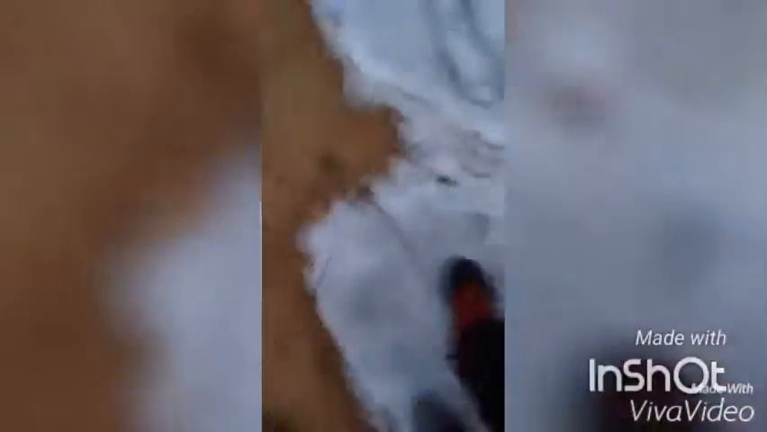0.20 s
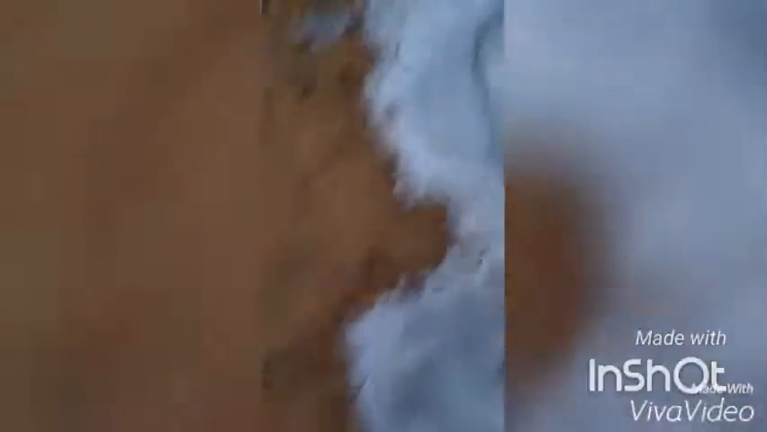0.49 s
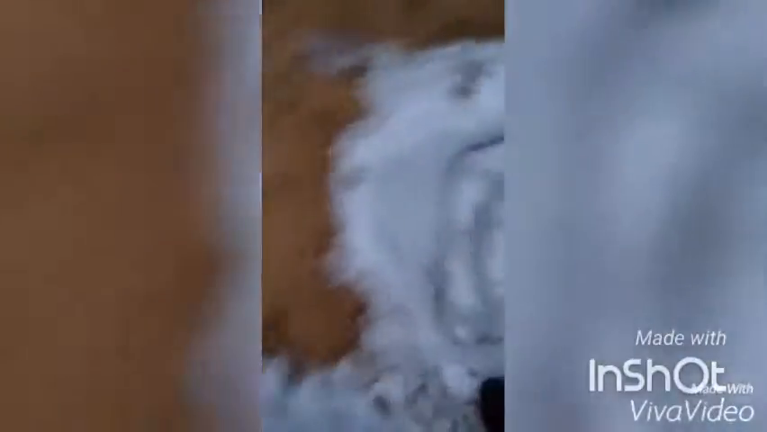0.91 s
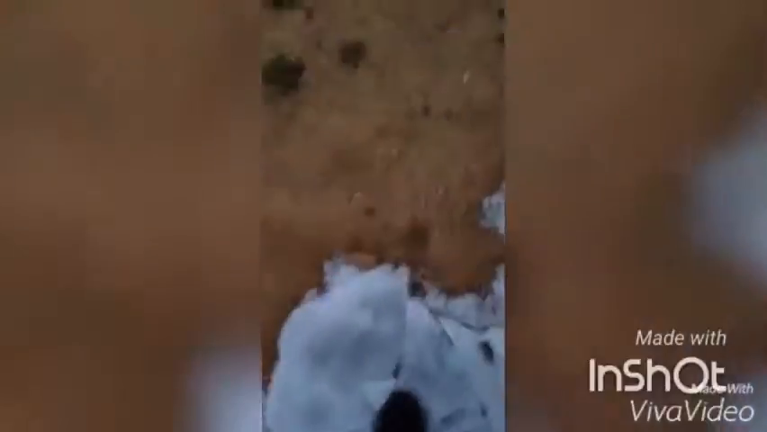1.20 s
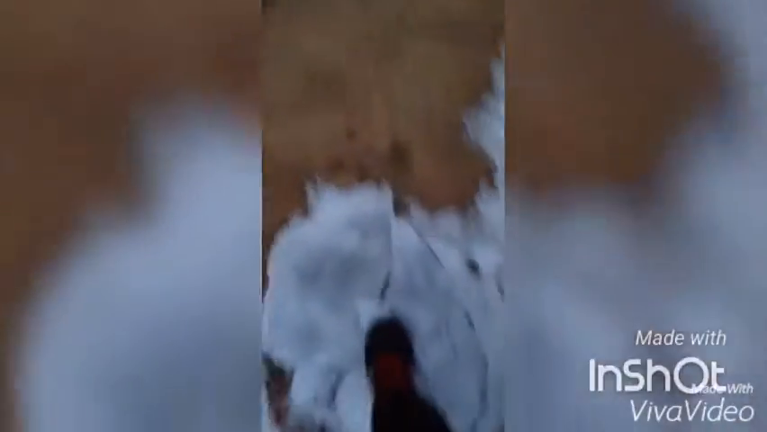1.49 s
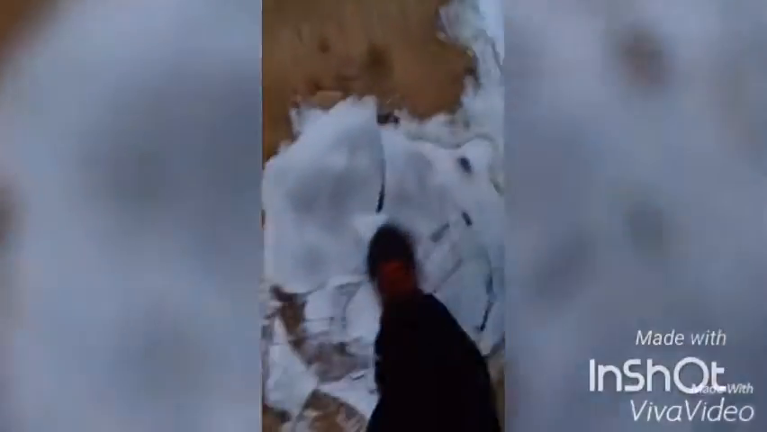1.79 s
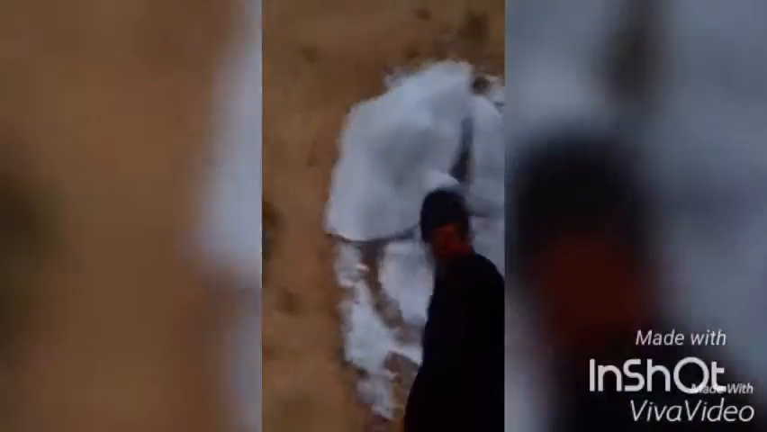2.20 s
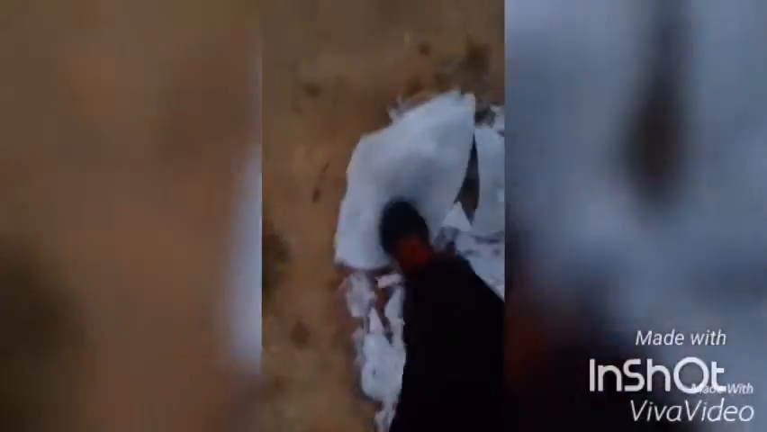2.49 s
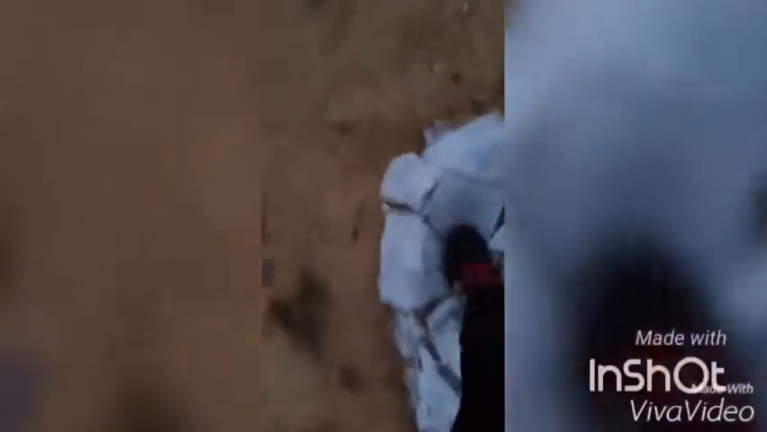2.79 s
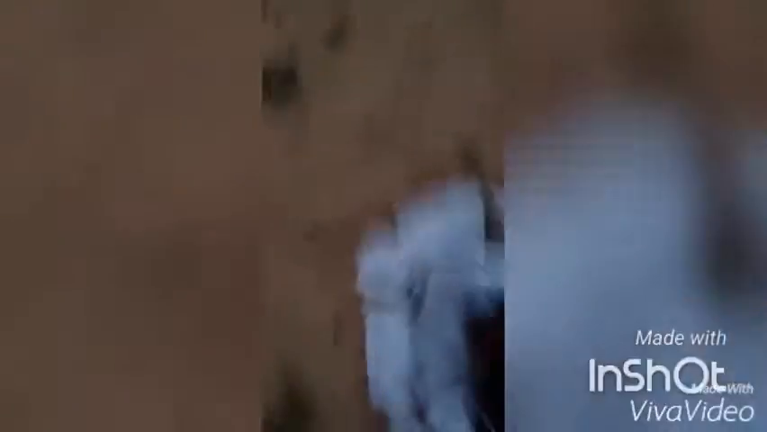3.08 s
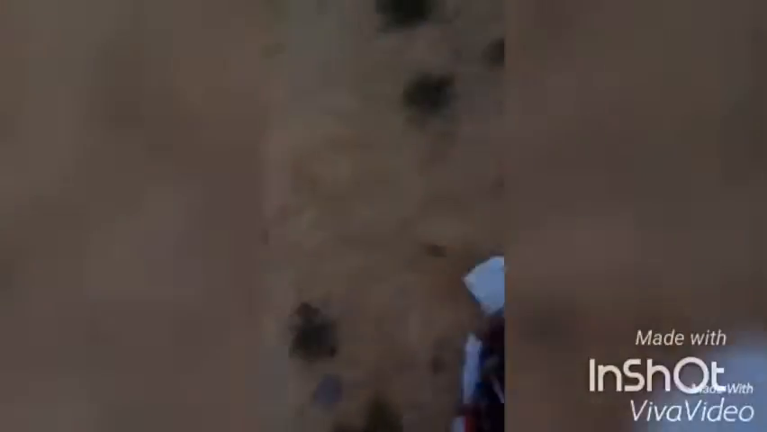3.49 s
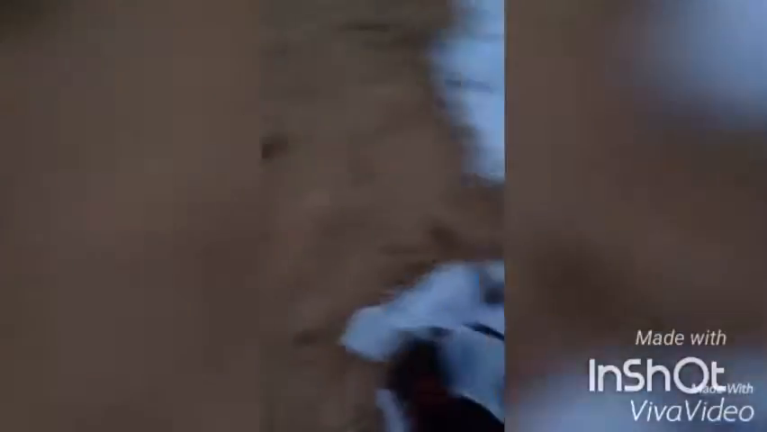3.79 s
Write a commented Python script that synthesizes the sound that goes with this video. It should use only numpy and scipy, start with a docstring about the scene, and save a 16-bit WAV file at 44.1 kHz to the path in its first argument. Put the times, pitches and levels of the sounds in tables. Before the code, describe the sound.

Shoes tread on brittle icy snow over bare ground outdoors, close to the microphone: a sudden heavy crunch, scattered snaps and softer crumbling with low thuds, then sharp cracks near the end and a quick fade.

```python
"""Outdoors on bare ground, close to the microphone: shoes tread through a brittle crust of ice and snow.
Plates snap as dying volleys of clicks with a short knock; the crust crumbles into many tiny fractures,
each ticking and knocking one of thirty fragments. Flakes chip off, loose slabs grind or ring from a short
knock, and the walker's weight makes the sheet thud and rumble. Noise gives the hiss of packing snow and
the quiet air behind."""
import sys
import numpy as np
from scipy import signal
from scipy.io import wavfile

SR = 44100
rng = np.random.default_rng(int(sys.argv[2]) if len(sys.argv) > 2 else 0)


def dump(signal):
    """Clip the signal to [-1, 1] and save it as 16-bit WAV at the path in sys.argv[1]."""
    limited = np.clip(np.atleast_2d(signal).T, -1, 1)
    pcm = np.round(limited * 32767).astype(np.int16)
    wavfile.write(sys.argv[1], SR, pcm)


N = 174195
T = np.arange(N) / SR

# Crumbling under the sole. Each row: time in seconds, level of the fine grains in dB,
# level of the coarse chunks in dB.
CRUSH = [(0.1,-69,-66.5),(0.226,-50.5,-42.5),(0.236,-20,-26),(0.33,-19,-22.5),(0.485,-23,-20.5),(0.51,-29.5,-33),(0.595,-20.5,-29.5),(0.635,-34.5,-34),(0.72,-46,-53.5),(0.865,-38.5,-45.5),(0.89,-25,-39.5),(0.95,-29,-34.5),(1.135,-25,-31.5),(1.18,-33,-41.5),(1.37,-61,-61),(1.55,-32,-38),(1.68,-53.5,-61),(1.74,-46.5,-36.5),(1.83,-51.5,-56),(1.925,-42,-34.5),(1.98,-24,-21.5),(2.085,-38,-33),(2.12,-65,-59),(2.2,-48,-41),(2.245,-58.5,-44),(2.275,-37,-29.5),(2.38,-27.5,-25),(2.48,-29.5,-29),(2.58,-37,-35),(2.675,-46,-62),(2.8,-28,-29),(2.87,-34,-33.5),(2.96,-32.5,-28.5),(3.025,-37.5,-41.5),(3.15,-45.5,-60),(3.175,-29,-32.5),(3.31,-41,-38),(3.44,-43,-40.5),(3.495,-29.5,-36),(3.603,-38,-33),(3.624,-16,-23.5),(3.68,-41.5,-44.5),(3.74,-35.5,-51.5),(3.93,-52,-58.5)]
# Spectrum of coarse, chunky ice. Each row: frequency in Hz, density in dB per Hz.
COARSE = [(50,-59.5),(190,-10),(420,-2.5),(650,-3.5),(1200,-4),(4000,-18.5)]
SNAP_SPAN_S = 0.011  # cracks and chips have their levels counted over this span


def amp(db):
    """Decibels to gain."""
    return 10 ** (np.asarray(db) / 20)


def unit(x, seconds=None):
    """Scales to rms 1, counting all energy as lying within the given span."""
    span = seconds * SR if seconds else len(x)
    return x / np.sqrt(np.sum(x ** 2) / span + 1e-20)


def add(mix, s, sound):
    """Mixes a sound in at time s, in place."""
    part = mix[max(round(s * SR), 0):][:len(sound)]
    part += sound[:len(part)]


def colour(x, points, size=4096):
    """Causal minimum-phase filter with the given spectrum in Hz and dB."""
    hz, db = np.transpose(points)
    f = abs(np.fft.fftfreq(size, 1 / SR))
    log_gain = np.log(amp(np.interp(np.log(f + 1), np.log(hz), db)))
    spectrum = np.exp(np.conj(signal.hilbert(log_gain)))
    taps = np.fft.ifft(spectrum).real[:size // 2]
    return signal.fftconvolve(x, taps)[:len(x)]


def resonance(x, hz, q):
    """A single resonance set ringing by x."""
    return signal.lfilter(*signal.iirpeak(hz, q, fs=SR), x)


def level(table, axis):
    """Gain curve over the whole scene from one dB column of a table."""
    rows = np.array(table)
    return amp(np.interp(T, rows[:, 0], rows[:, axis]))


def tread_effort():
    """How hard the sole crushes the crust: the fine-grain level relative to -30 dB."""
    return level(CRUSH, axis=1) / amp(-30)


def fractures(n, per_s, spread_db, cap):
    """Random clicks of either sign; their dB sizes are exponentially spread up to a cap."""
    sizes = amp(spread_db * np.minimum(rng.exponential(1, n), cap))
    signs = rng.choice([-1, 1], n)
    return sizes * signs * (rng.random(n) < per_s / SR)


def steadied(x, seconds):
    """Evens out the slow level and keeps the grain."""
    power = signal.fftconvolve(x ** 2, np.hanning(int(seconds * SR)), "same")
    return unit(x / np.sqrt(abs(power) + 1e-9))


def crack(db, body_db, treble_db, hz, size=3000):
    """A fracture runs through a plate as a quick dying volley of clicks, and the plate knocks."""
    # Spectra of the snap and of its treble splinters. Each row: frequency in Hz, density in dB per Hz.
    snap_spectrum = [(100,-52.5),(900,-3),(1600,-3),(2600,-2.5),(3400,0),(4700,-3),(6500,-8),(10000,-31.5)]
    splinter_spectrum = [(4000, -21.5), (5500, 12.5), (8000, 6), (10000, -4.5)]
    plate_fade_s, plate_share = 0.0028, 0.75  # share of the body's power from the plate's knock
    t = np.arange(size) / SR

    fade_s = 0.0028 * 2 ** ((db + 46.5) / 31)  # louder cracks run longer, doubling every 31 dB
    run = fractures(size, per_s=7000, spread_db=3.0, cap=1.9)
    debris = 0.017 * np.sqrt(amp(db + 13.0)) * np.exp(-t / 0.05)  # big cracks shed more crumbs
    volley = run * (np.exp(-t / fade_s) + debris)
    volley = volley + resonance(volley, rng.uniform(2800, 7670), 12)  # a splinter rings

    plate = np.cos(2 * np.pi * hz * t) * np.minimum(t * hz, 1) * np.exp(-t / plate_fade_s)
    rubble = unit(colour(volley, COARSE))
    body = np.sqrt(plate_share) * unit(plate) + np.sqrt(1 - plate_share) * rubble

    snap = unit(colour(volley, snap_spectrum), SNAP_SPAN_S)
    splinters = unit(colour(volley, splinter_spectrum), SNAP_SPAN_S)
    return amp(db) * (snap + amp(body_db) * unit(body, SNAP_SPAN_S) + amp(treble_db) * splinters)


def crumbling(count=30, size=1024):
    """Each tiny fracture ticks and knocks one of many fragments; light treading leaves them sparse."""
    # Spectrum of the fine grains. Each row: frequency in Hz, density in dB per Hz.
    fine_spectrum = [(80,-67),(300,-27),(900,-1),(1600,3),(2700,-9),(3300,1.5),(7000,-2),(9800,-7.5)]
    fractures_per_s, crowding = 1300, 0.4  # rate at effort 1; exponent by which it follows effort
    shard_pitch_ratio = 2.43  # small shards knock this much higher than slabs

    rate = fractures_per_s * tread_effort() ** crowding
    clicks = fractures(N, per_s=rate, spread_db=5.0, cap=3.56)
    fragment = rng.integers(0, count, N)
    t = np.arange(size) / SR
    fine, coarse = np.zeros((2, N))
    tick_hz = rng.permutation(np.geomspace(1700, 9500, count))
    for k, knock_hz in enumerate(np.geomspace(380, 1600, count)):
        tick_noise, knock_noise = rng.standard_normal((2, size))
        ring = resonance(tick_noise * np.exp(-t / 0.0029), tick_hz[k], 7)
        snap = tick_noise * np.exp(-t / 0.00065)
        tick = unit(ring) + 0.64 * unit(snap)
        tone = np.sin(2 * np.pi * knock_hz * t) * np.exp(-t * knock_hz / 2.8)
        thump = knock_noise * np.exp(-t / 0.0013)
        knock = unit(tone) + 1.4 * unit(thump)
        # A fragment with a higher tick ticks louder and knocks softer.
        tilt = np.sqrt(tick_hz[k])
        own = clicks * (fragment == k)
        fine += signal.oaconvolve(own, tick * tilt)[:N]
        coarse += signal.oaconvolve(own, knock / tilt)[:N]

    # The pieces get smaller and knock higher as the sheet is trampled.
    broken = (T / T[-1]) ** 2
    slabs = unit(colour(coarse, COARSE))
    shards = unit(colour(coarse, np.array(COARSE) * [shard_pitch_ratio, 1]))
    chunks = (1 - broken) * slabs + broken * shards
    grains = steadied(colour(fine, fine_spectrum), 0.073)
    return grains * level(CRUSH, axis=1) + steadied(chunks, 0.6) * level(CRUSH, axis=2)


def chip(db, size=1024):
    """A small flake breaks off in one sharp tick and rings briefly at its own pitch."""
    fade_s = 0.0013
    tick = rng.standard_normal(size) * np.exp(-np.arange(size) / SR / fade_s)
    ring = resonance(tick, rng.uniform(1270, 7660), 10)
    snap = colour(tick, [(200, -12.5), (700, 0.5), (9000, -6)])
    return amp(db) * unit(snap + 2 * ring, SNAP_SPAN_S)


def loose_slab(length, db, hz):
    """A loose slab grinds, or rings from a short knock: quick uneven jolts excite its resonance."""
    width_hz = 71
    n = int(length * SR)
    jolts = fractures(n, per_s=1100, spread_db=5.5, cap=3.5)
    ring = resonance(jolts, hz, hz / width_hz)
    return amp(db) * unit(ring * signal.windows.tukey(n))


def thud(db, size=6000):
    """The sheet flexes against the ground: a few damped, uneven cycles."""
    centre_hz, rise_s, fade_cycles, span_s = 166, 0.0033, 1.8, 0.014  # level counted over the span
    t = np.arange(size) / SR
    hz = centre_hz * 2 ** rng.uniform(-0.68, 0.52)  # each thud has its own pitch
    shape = np.minimum(t / rise_s, 1) * np.exp(-t * centre_hz / fade_cycles)
    grit = colour(rng.standard_normal(size), [(45, -24), (centre_hz, 0), (370, -5), (1100, -40)])
    flex = np.sin(2 * np.pi * hz * t) + 0.51 * unit(grit)
    return amp(db) * unit(shape * flex, span_s)


def rumble():
    """Dull bumps of ice and soil settling under the foot: random clicks filtered to the bass."""
    # Weight shifting on the sheet. Each row: time in seconds, level of the rumble in dB.
    weight = [(0.12,-62),(0.24,-54),(0.68,-69),(1.3,-53),(1.41,-32.5),(1.68,-46.5),(1.85,-49),(2.12,-31.5),(2.3,-60),(2.52,-33.5),(2.63,-59),(2.78,-33.5),(3.02,-62),(3.42,-38.5),(3.7,-71)]
    # Spectrum of the bumps. Each row: frequency in Hz, density in dB per Hz.
    rumble_spectrum = [(30,-22),(65,9),(250,-3.5),(400,-17),(2000,-53.5)]
    bumps = colour(fractures(N, per_s=360, spread_db=1.0, cap=5.2), rumble_spectrum)
    return steadied(bumps, 0.08) * level(weight, axis=1)


def powder():
    """Loose snow hisses softly as it packs and slides: noise that follows the treading effort."""
    spectrum = [(150, -29), (600, -18.0), (2600, 2.5), (3500, 1), (9500, -3.5)]
    hiss = unit(colour(rng.standard_normal(N), spectrum))
    return amp(-34.5) * tread_effort() * hiss  # -34.5 dB at effort 1


def scatter(x, db, fade_s, size=8000):
    """Adds faint, short reflections from the ground and the walker, starting 3 ms late."""
    t = np.arange(size) / SR
    echoes = fractures(size, per_s=4900, spread_db=-5.0, cap=9.0)
    tail = echoes * np.exp(-t / fade_s) * (t > 0.003)
    return x + amp(db) * signal.fftconvolve(x, tail / np.linalg.norm(tail))[:N]


def outdoor_air():
    """Quiet, steady outdoor air: noise weighted to the bass."""
    # Spectrum of the air. Each row: frequency in Hz, density in dB per Hz.
    air_spectrum = [(65,-7),(200,-2.5),(800,-15),(1500,-25.5),(9500,-26)]
    return amp(-58.5) * unit(colour(rng.standard_normal(N), air_spectrum))


def scene():
    """Cracks, chips, crumbling, loose slabs and thuds with reflections, over snow hiss, rumble and air."""
    # Plates snapping. Each row: start in seconds, snap level in dB, body level in dB re the snap,
    # treble level in dB re the snap, plate pitch in Hz.
    crack_rows = [(0.236,-18.5,3,-9,415),(0.347,-30,8.5,9,446),(0.465,-28.5,8.5,7,820),(0.582,-16,-7,-0.5,684),(0.614,-17,-4.5,-2.5,495),(0.794,-47.5,4,15,640),(0.877,-22,-8,-1.5,516),(0.987,-19,-3,-18,1630),(1.021,-21.5,-3,-5.5,483),(1.106,-25.5,-2,7,1240),(1.321,-39,0,-14,545),(1.354,-27.5,-6,-15,860),(1.404,-27.5,0,4.5,400),(1.868,-37,9,-27,780),(1.894,-32,9,-0.5,650),(1.939,-26,5.5,0.5,710),(1.9679,-21.5,-3.5,-10,460),(2.058,-29.5,11,2.5,700),(2.18,-41,1,-12,850),(2.26,-21.5,8,-2,703),(2.3,-22,0.5,5,1220),(2.3517,-34.5,14,-25,686),(2.546,-22,1,0,655),(2.556,-24,2,5.5,863),(2.703,-32.5,-16.5,6,1270),(2.897,-43,15.5,-11,1410),(2.954,-13.5,-3,-0.5,647),(2.982,-21,-1.5,-2.5,1046),(3.0851,-16.5,-5,-4,1310),(3.131,-39,4.5,-15,1170),(3.2897,-31,7,2.5,1290),(3.551,-33.5,7.5,2,1290),(3.626,-14,-5,-14,1290),(3.69,-28.5,-22,-6.5,1430),(3.872,-27,-8,1.5,1130)]
    # Flakes chipping off. Each row: start in seconds, level in dB.
    chip_rows = [(1.116,-31),(1.469,-34.5),(1.502,-34),(1.553,-37),(1.569,-30),(2.352,-32),(2.405,-29.5),(2.644,-36),(2.934,-31),(3.167,-24.5),(3.177,-35.5),(3.335,-26),(3.366,-27.5),(3.404,-26.5),(3.48,-20.5)]
    # Loose slabs grinding, or ringing from a short knock. Each row: start in seconds,
    # length in seconds, level in dB, resonance in Hz.
    slab_rows = [(0.337,0.021,-18.5,385),(0.766,0.015,-35,380),(0.875,0.035,-28,587),(1.0,0.16,-31,474),(1.412,0.028,-30.5,493),(3.47,.04,-38.5,675),(3.62,0.041,-21,1135),(3.722,0.048,-39,2070),(3.8,0.031,-39.5,1420)]
    # The sheet giving way. Each row: start in seconds, level in dB.
    thud_rows = [(0.237,-22),(0.26,-20.5),(1.374,-24),(1.402,-23.5),(1.555,-31),(1.619,-23.5),(1.703,-38),(1.738,-32),(1.81,-35),(2.048,-35),(2.078,-26),(2.101,-31.5),(2.17,-32.5),(2.447,-29.5),(2.48,-27.5),(2.506,-21),(2.715,-33),(2.758,-31.5),(2.789,-32),(2.856,-31),(3.417,-32.5)]

    ice = crumbling()
    events = (crack_rows, crack), (chip_rows, chip), (slab_rows, loose_slab), (thud_rows, thud)
    for rows, source in events:
        for s, *settings in rows:
            add(ice, s, source(*settings))
    mix = scatter(ice, db=-16, fade_s=0.017) + powder() + rumble() + outdoor_air()
    return mix[None]


def record(dry):
    """The recorder's band limit and full scale: low-pass, clip, low-pass again."""
    cutoff_hz = 10350
    low_pass = signal.firwin(171, cutoff_hz, window=("kaiser", 8), fs=SR)[None]
    clipped = np.clip(signal.oaconvolve(dry, low_pass, "same"), -1, 1)
    return signal.oaconvolve(clipped, low_pass, "same")


dry = scene()
out = record(dry)
dump(out)
```